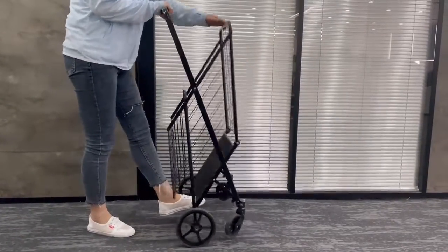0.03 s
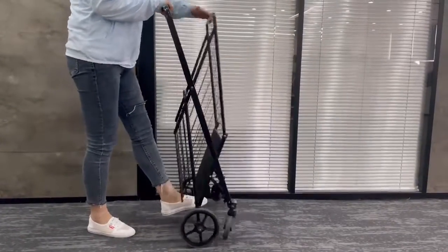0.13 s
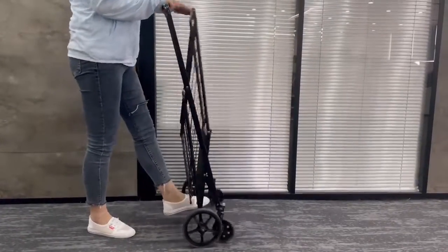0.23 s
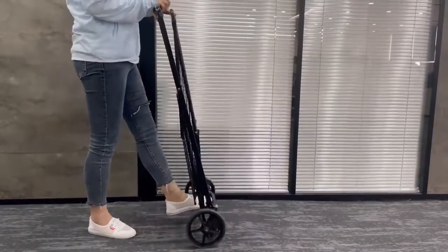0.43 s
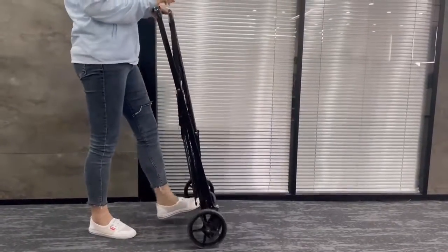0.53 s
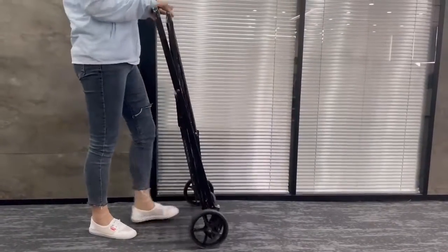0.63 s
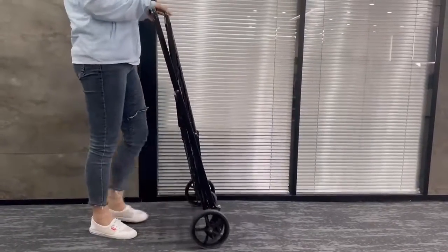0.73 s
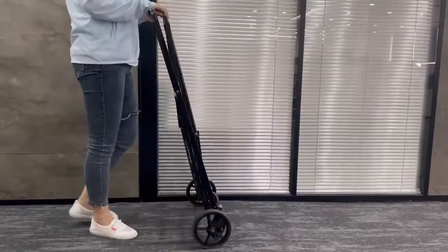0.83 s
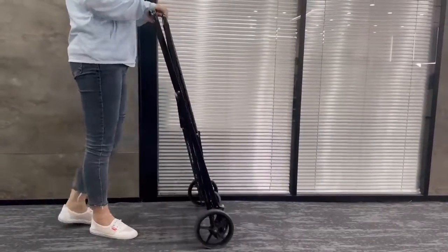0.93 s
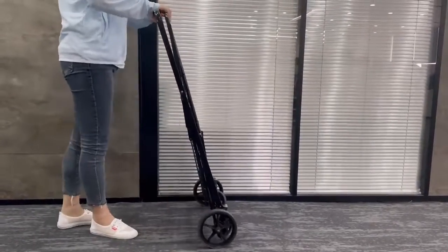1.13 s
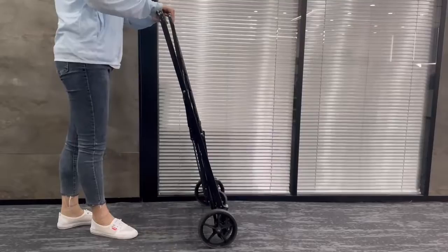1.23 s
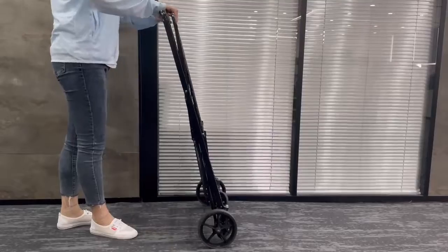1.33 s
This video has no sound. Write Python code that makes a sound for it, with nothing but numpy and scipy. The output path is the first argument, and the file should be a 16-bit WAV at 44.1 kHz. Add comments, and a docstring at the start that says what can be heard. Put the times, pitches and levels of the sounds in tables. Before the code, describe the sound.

A steel wire shopping cart is folded shut: a light jingle and hinge knocks, then one sharp, ringing clack. Faint rattles, a small creak and two soft footsteps on carpet follow, over the ventilation hum of a quiet room.

```python
"""A steel wire shopping cart is folded shut on carpet in a quiet office with glass walls.
Over the rush and hum of ventilation, loose wires jingle and a pivot creaks by stick-slip friction.
From 0.23 s the basket wires brush together and the hinges knock. At 0.36 s the frame slams closed:
a volley of impacts excites the modes of wires, tubes and base plate, which decay freely.
Last, the cart is tilted upright with faint jingles, scuffs, a creak and two soft footfalls."""
import sys
import numpy as np
from scipy.fft import rfft, irfft, next_fast_len
from scipy.io import wavfile
from scipy.ndimage import map_coordinates

SR = 44100
rng = np.random.default_rng(int(sys.argv[2]) if len(sys.argv) > 2 else 0)


def output_pcm(signal):
    """Save a mono or channel-first signal as 16-bit PCM at the path in sys.argv[1].

    Samples are clipped to [-1, 1] before scaling.
    """
    pcm = np.clip(np.atleast_2d(signal).T, -1, 1) * 32767
    wavfile.write(sys.argv[1], SR, np.round(pcm).astype(np.int16))


N = 61739

# spectrum of the ventilation: (frequency [Hz], level [dB])
AIR_SPECTRUM = [(12, -58), (20, -26), (54, -3.5), (129, -5), (140, -8.5), (219, -2.5), (266, -8), (298, -7),
                (439, -6), (705, -11), (1630, -16), (3640, -30), (4430, -38.5), (5530, -42), (8170, -53),
                (15500, -74)]
# left-right likeness of room and cart sounds: (frequency [Hz], correlation [clipped to -1..1])
ROOM_CORRELATION = [(40, 1), (125, 0.84), (250, 0.84), (600, 0), (1200, 0.28), (3000, 0), (8000, 0.7),
                    (12000, 0)]
CART_CORRELATION = [(100, 3), (400, 2.5), (1200, 0.27), (2000, 0), (3300, -0.41), (5500, 0), (8300, -0.44),
                    (10500, -0.68), (13000, 1.1)]
# stereo balance of the steel: (frequency [Hz], left minus right [dB])
CART_BALANCE = [(200, 2), (750, 1.5), (2000, 0), (3300, -1.5), (4600, 5.5), (6300, 8), (8300, 3.5),
                (10000, -0.5)]
# contacts that excite the wires: (time [s], level [dB], treble gain [dB])
JINGLE_CONTACTS = [(0, -47.5, -4), (.075, -57.5, 7), (.693, -64, 20), (.795, -60, 3), (.858, -55, 6.5),
                   (.95, -51.5, -14), (1.03, -54.5, -7.5), (1.15, -52, -7.5), (1.28, -76.5, 22.5)]
BRUSH_CONTACTS = [(.2282, -36, -0.5), (.2415, -37, 2.5), (.2505, -41, -9), (.2865, -41, -11)]
CRACK_CONTACTS = [(.2424, -25, 2), (.3570, -18.5, -20), (.3588, -18.5, -21), (.3614, -23.5, -14),
                  (.3654, -16.5, -20), (.3728, -21, 3), (.3797, -26, -10), (.3885, -27, -12),
                  (.412, -29, -2)]
SLAM_CONTACTS = [(.3563, -28, -6.5), (0.3612, -30, -8), (0.3675, -28.5, 5.5), (0.3728, -31, 4.5),
                 (0.3797, -30.5, -4), (0.389, -34.5, 8.5)]
# tone colours as heard: (frequency [Hz], level [dB])
# jingle, brush and slam have a gap in the treble near 9.4 kHz
JINGLE_TONE = [(300, 2.5), (1500, -3.5), (2800, 0), (4500, -2), (5600, -10.5), (6800, -4.5), (7500, -13),
               (8200, -1), (9300, -14), (12500, -11), (15500, -26)]
BRUSH_TONE = [(100, -11), (700, -12.5), (1600, -3.5), (2200, -6.5), (2650, 3.5), (3550, -6.5), (4800, -1.5),
              (5600, -11.5), (6300, -4), (7600, -13), (8300, -6), (9500, -37), (13000, -17.5), (15500, -41)]
HINGE_TONE = [(1000, -14), (2000, 2), (2550, 3), (2850, -3), (3300, -13)]
CRACK_TONE = [(200, -28), (800, -17), (1600, -3.5), (2900, 11.5), (4000, 5), (5000, -9), (8000, -11),
              (10000, -19), (15000, -36)]
SLAM_TONE = [(40, -22), (100, -15), (160, -16), (240, -8.5), (370, -3), (650, -8.5), (850, -9.5),
             (1150, 1.5), (2000, 1.5), (2900, 5.5), (4200, 0.5), (5100, 1), (5650, -7.5), (6500, 2.5),
             (7500, -6.5), (8300, 4.5), (9500, -16.5), (10600, 0), (12300, -9), (13900, -7.5), (15500, -34)]
# creaking pivots: (time [s], level [dB], frequency [Hz], T60 [s], octave gain [dB])
PIVOT_CREAKS = [(.085, -51.5, 4480, 0.21, -5), (1.115, -38, 1556, .12, -21)]
# single wires clicking: (time [s], level [dB], centre frequency [Hz])
WIRE_TICKS = [(0.2268, -43, 9000), (0.361, -24.5, 9000), (0.3668, -26, 9000), (0.378, -22, 12700),
              (0.385, -21.5, 10600), (1.151, -52.5, 8600)]
# blows on hinges and stops, and on base plate and wheels: (time [s], level [dB], frequency [Hz], T60 [s])
HINGE_KNOCKS = [(0.2421, -17, 2650, 0.0082), (0.2864, -18.5, 2870, 0.0071), (0.356, -21, 2770, 0.012),
                (0.3615, -28, 2960, 0.01), (0.3642, -26, 3120, 0.014), (1.033, -47, 2660, 0.012)]
BASE_THUDS = [(0.356, -30.5, 388.7, 0.12), (0.376, -23.5, 138, 0.046), (0.438, -38, 61.5, 0.076)]
# modes of the frame tubes and the clearest of the wires: (frequency [Hz], level [dB], T60 [s])
TUBE_MODES = [(996, -10.5, 0.99), (1234, 1, 0.14), (1333, -1.5, 0.28), (1448, -7.5, 0.74), (1858, -9, 0.58),
              (2465, -10, 0.46), (2550, -8, 0.32), (2650, -16, 0.25), (2805, -4.5, 0.39), (3150, 1, 0.28),
              (3171, -10, 0.36), (3260, 0, 0.24), (3700, -11, 0.35), (4170, -10, 0.28)]
WIRE_MODES = [(4970, -20, 0.22), (6627, -20, 0.22), (6971, -12, 0.8), (8220, -8, 0.47), (8399, -5, 0.38),
              (10700, -13, 0.23), (11660, -7, 0.21), (12660, -7, 0.37)]
# shoes and wheels rubbing the carpet: (time [s], level [dB], centre frequency [Hz], T60 [s])
CARPET_SCUFFS = [(.885, -55.5, 4340, 0.32), (1.031, -42, 2660, 0.056), (1.166, -57, 4060, 0.075)]
# soles landing: (time [s], level [dB], peak frequency [Hz])
FOOTFALLS = [(1.037, -36.5, 255), (1.192, -30, 290)]


def amp(db):
    """Amplitude ratio of a level in decibels."""
    return 10 ** (np.asarray(db) / 20)


def unit_rms(x):
    """Normalisation to unit mean power."""
    return x / np.sqrt(np.mean(x ** 2) + 1e-20)


def along(points, hz):
    """Interpolation of (frequency, value) points on a logarithmic frequency axis."""
    frequencies, values = np.transpose(points)
    return np.interp(np.log(hz + 1), np.log(frequencies + 1), values)


def filtered(x, response):
    """Linear filtering: the spectrum is multiplied by a frequency response."""
    size = next_fast_len(N + 8192)
    return irfft(rfft(x, size) * response(np.fft.rfftfreq(size, 1 / SR)), size)[..., :N]


def wobble(rate):
    """Smooth random modulation with `rate` knots a second."""
    return map_coordinates(rng.standard_normal(256), [np.arange(N) * rate / SR], mode="wrap")


def stereo_angle(correlation, hz):
    """Half the angle whose cosine is the left-right correlation."""
    return np.arccos(np.clip(along(correlation, hz), -1, 1)) / 2


def noise(spectrum, correlation):
    """Partly coherent stereo noise of rms 1, mixed from independent mid and side signals."""
    def response(hz):
        angle = stereo_angle(correlation, hz)
        return amp(along(spectrum, hz)) * [np.cos(angle), np.sin(angle)]
    mid, side = filtered(rng.standard_normal((2, N)), response)
    return unit_rms(np.array([mid + side, mid - side]))


def band(hz):
    """A narrow band-pass spectrum centred on hz."""
    return [(hz / 4, -35), (hz / 1.28, -12), (hz, 0), (hz * 1.28, -12), (hz * 3, -35)]


def since(start):
    """Seconds elapsed since start, zero before it."""
    return np.maximum(np.arange(N) / SR - start, 0)


def struck(start, rise, t60):
    """Envelope of a damped vibration: a quick rise, then a fall of 60 dB in t60 seconds."""
    t = since(start)
    return (1 - np.exp(-t / rise)) * np.exp(-np.log(1000) * t / t60)


def basket_response():
    """Overlapping resonances give the wire grid a response of dense, uneven peaks."""
    spacing_hz, depth_db = 30, 2.8
    peaks = rng.standard_normal(1024)
    def response(hz):
        ripple = np.clip(map_coordinates(peaks, [hz / spacing_hz]), -2, 2)
        return amp(depth_db * ripple * hz / (hz + 1500))
    return response


def wires(contacts, tone, basket, body, treble, room_db, room_t60):
    """Dense modes ring as noise; reverberation adds in power. body, treble: (rise [s], T60 [s])."""
    crossover_hz = 5470
    out = np.zeros((2, N))
    for start, db, treble_db in contacts:
        ring = unit_rms(filtered(noise(tone, CART_CORRELATION), basket))
        lows = filtered(ring, lambda hz: 1 / (1 + (hz / crossover_hz) ** 6))
        highs = amp(treble_db) * (ring - lows)
        room = amp(room_db) * struck(start, 0.055, room_t60)
        out += amp(db) * lows * np.hypot(struck(start, *body), room)
        out += amp(db) * highs * np.hypot(struck(start, *treble), room)
    return out


def ringing(start, modes, rise):
    """Struck steel is a sum of damped modes, each unsteady as the parts chatter together."""
    out = np.zeros((2, N))
    for hz, db, t60 in modes:
        spread = stereo_angle(CART_CORRELATION, hz) * np.array([[1], [-1]])
        phase = 2 * np.pi * (hz * since(start) + rng.random())
        jitter = .5 * wobble(50) + .3 * np.array([wobble(40), wobble(40)])
        envelope = amp(db + 3 * wobble(36.6)) * struck(start, rise, t60)
        out += envelope * np.sin(phase + jitter + spread)
    return out


def ventilation(hum_hz=66):
    """Broadband air noise lies over a low hum modulated in phase and amplitude."""
    phase = 2 * np.pi * hum_hz * since(0) + .6 * wobble(7)
    hum = np.sqrt(2) * np.sin(phase) * amp(2.5 * wobble(8))
    return amp(-43.5) * noise(AIR_SPECTRUM, ROOM_CORRELATION) + amp(-58) * hum


def jingles(basket):
    """Light impacts of loose wires excite the basket's resonances."""
    return wires(JINGLE_CONTACTS, JINGLE_TONE, basket,
                 body=(0.0012, 0.45), treble=(0.0015, 0.24), room_db=-4, room_t60=1.0)


def creaks(wander_hz=69):
    """Stick-slip friction in a dry pivot gives a rough, wavering note and its octave."""
    out = np.zeros(N)
    for start, db, hz, t60, octave_db in PIVOT_CREAKS:
        phase = 2 * np.pi * np.cumsum(hz + wander_hz * wobble(170)) / SR
        envelope = amp(db + 2.8 * wobble(150)) * struck(start, 0.014, t60)
        out += envelope * (np.sin(phase) + amp(octave_db) * np.sin(2 * phase))
    return out


def ticks():
    """Sudden release as one wire slips off another radiates a bright transient."""
    return sum(amp(db) * struck(start, rise=0.00042, t60=0.017) * noise(band(hz), CART_CORRELATION)
               for start, db, hz in WIRE_TICKS)


def brush(basket):
    """Glancing contacts set the folding wires in free vibration."""
    return wires(BRUSH_CONTACTS, BRUSH_TONE, basket,
                 body=(0.00073, 0.3), treble=(0.00035, 0.23), room_db=-8, room_t60=0.97)


def knocks(lag_s=.00004, pan_db=-1.0):
    """Hinges and stops act as heavily damped oscillators with one overtone at the octave."""
    out = np.zeros((2, N))
    for start, db, hz, t60 in HINGE_KNOCKS:
        for ear, arrival in enumerate([start, start + lag_s]):
            phase = 2 * np.pi * hz * since(arrival)
            note = np.sin(phase) + amp(-10.5) * np.sin(2 * phase)
            out[ear] += amp(db) * struck(arrival, 0.00048, t60) * note
    return out * amp([[pan_db / 2], [-pan_db / 2]])


def hinge_ring():
    """Mechanical coupling carries the first hinge knock into the tube modes."""
    ring = amp(-39) * ringing(HINGE_KNOCKS[0][0], TUBE_MODES, rise=0.0011)
    return filtered(ring, lambda hz: amp(along(HINGE_TONE, hz)))


def cracks(basket):
    """Hard impacts of steel on steel give dry, rapidly decaying transients."""
    return wires(CRACK_CONTACTS, CRACK_TONE, basket,
                 body=(0.0004, 0.017), treble=(0.00028, 0.0092), room_db=-21, room_t60=0.3)


def thuds():
    """The base plate and wheels take the blow in low, damped modes."""
    return sum(amp(db) * struck(start, 0.0064, t60) * np.sin(2 * np.pi * hz * since(start))
               for start, db, hz, t60 in BASE_THUDS)


def slam(basket):
    """The wires' responses to the closing frame's impacts superpose into one crash."""
    return wires(SLAM_CONTACTS, SLAM_TONE, basket,
                 body=(0.00093, 0.39), treble=(0.0011, 0.3), room_db=-16.5, room_t60=0.82)


def tube_ring():
    """The slam's first impact excites the natural frequencies of the tubes."""
    return amp(-33.5) * ringing(SLAM_CONTACTS[0][0], TUBE_MODES, rise=0.0037)


def wire_ring():
    """The basket shuts just after the frame, and its clearest modes decay freely."""
    return amp(-30.5) * ringing(start=.367, modes=WIRE_MODES, rise=.002)


def scuffs():
    """Sliding friction of rubber on carpet pile gives a soft, narrow-band swish."""
    return sum(amp(db) * struck(start, 0.011, t60) * noise(band(hz), ROOM_CORRELATION)
               for start, db, hz, t60 in CARPET_SCUFFS)


def footfalls():
    """Carpet cushions a sole's impact, so the energy lies at low frequencies."""
    out = np.zeros((2, N))
    for start, db, hz in FOOTFALLS:
        spectrum = [(20, -25), (hz, 0), (2 * hz, -5), (5 * hz, -25), (15000, -70)]
        out += amp(db) * struck(start, rise=0.0047, t60=0.049) * noise(spectrum, ROOM_CORRELATION)
    return out


def scene():
    """Air, cart and feet superpose; level differences between the ears place the steel."""
    basket = basket_response()
    steel = jingles(basket) + ticks() + brush(basket) + knocks() + hinge_ring() + cracks(basket)
    steel += thuds() + slam(basket) + tube_ring() + wire_ring()
    cart = filtered(steel, lambda hz: amp(along(CART_BALANCE, hz) * np.array([[.5], [-.5]])))
    return ventilation() + cart + creaks() + scuffs() + footfalls()


def record(dry):
    """An ideal low-pass filter limits the bandwidth to 15.7 kHz."""
    return filtered(dry, lambda hz: hz < 15700)


dry = scene()
out = record(dry)
output_pcm(out)
```